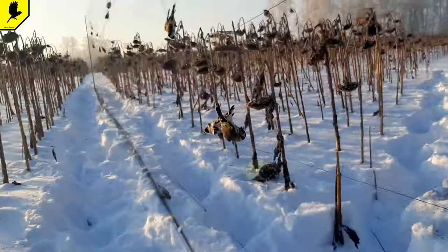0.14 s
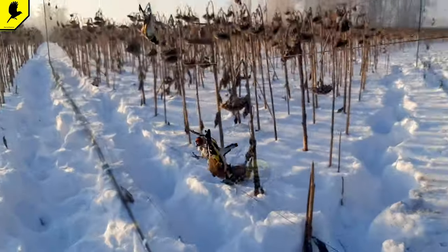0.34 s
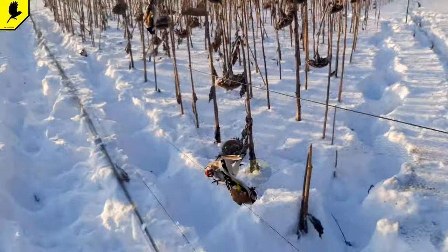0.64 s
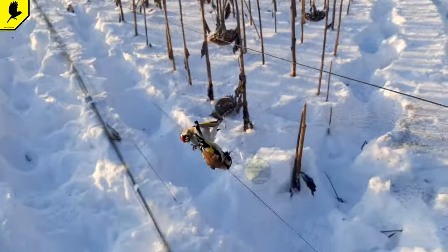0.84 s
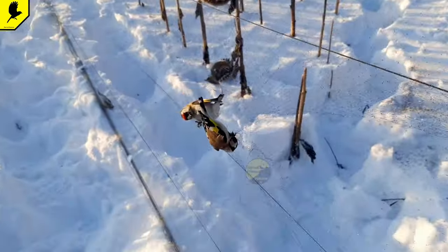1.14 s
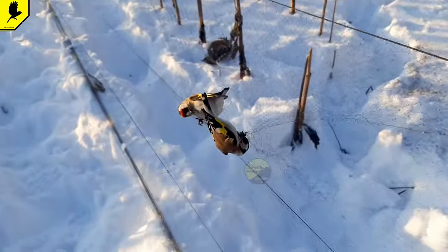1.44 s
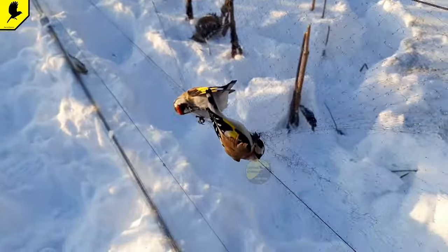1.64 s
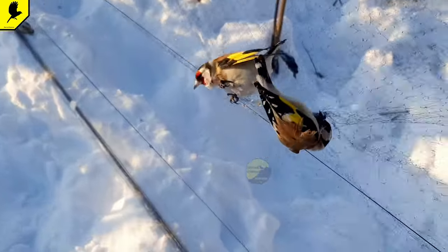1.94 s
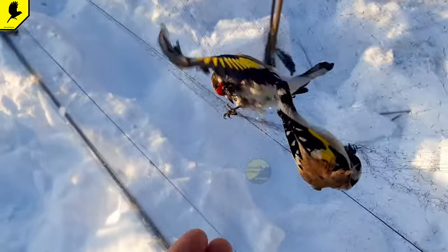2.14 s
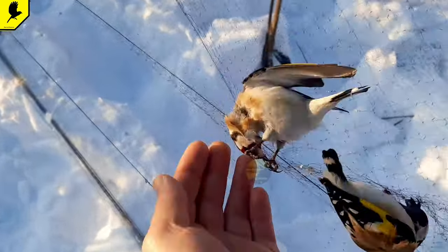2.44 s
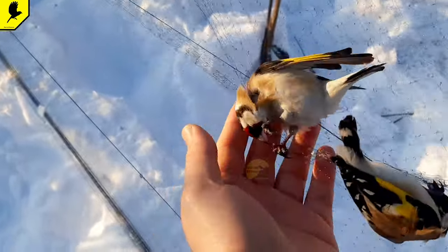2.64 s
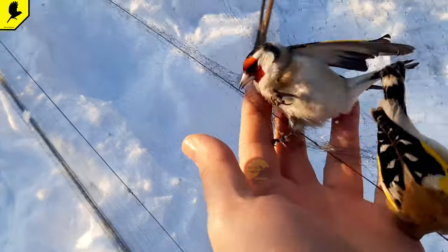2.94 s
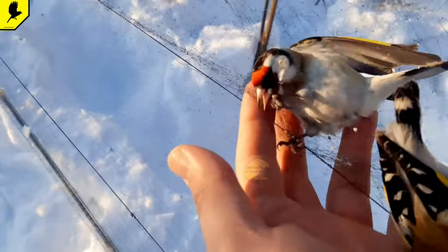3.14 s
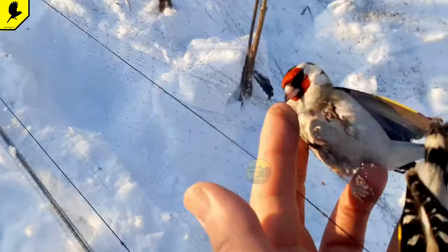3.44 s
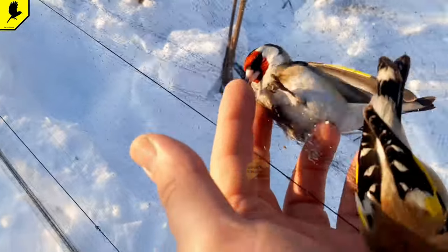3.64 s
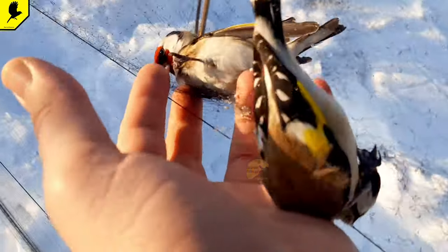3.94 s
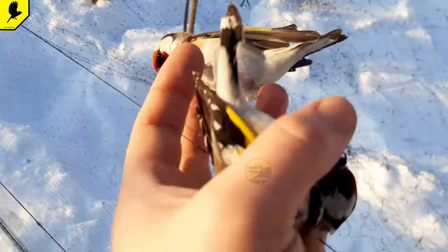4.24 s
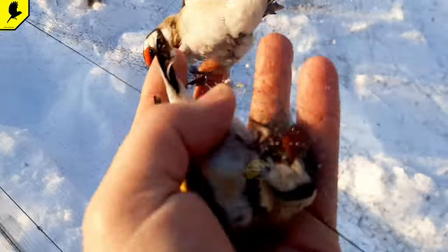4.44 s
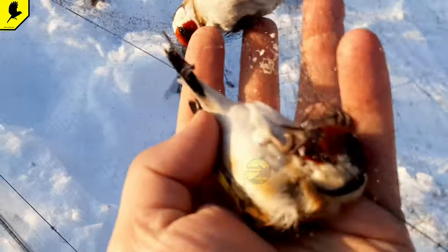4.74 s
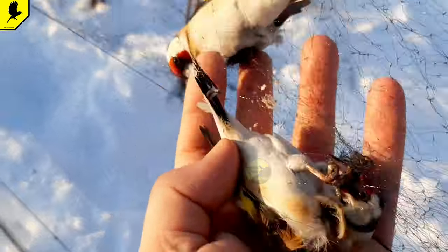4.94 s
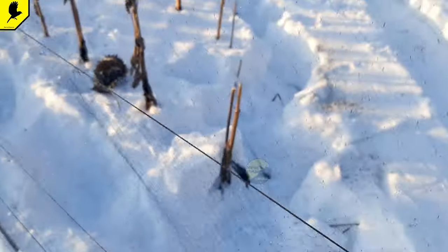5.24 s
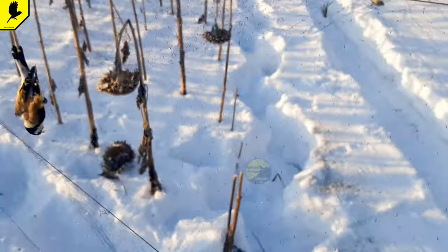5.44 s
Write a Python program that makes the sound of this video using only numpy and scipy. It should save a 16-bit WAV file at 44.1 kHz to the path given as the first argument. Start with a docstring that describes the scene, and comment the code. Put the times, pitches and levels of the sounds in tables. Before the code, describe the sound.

An open winter field heard through a close handheld stereo microphone. From 0 to 0.5 s, boots crunch sharply in cold packed snow, with creaks, brittle cracks and fine treble hiss. Finches chirp in quick, nearly pure whistles, mostly sliding downward, with faint scattered echoes and blurred farther twittering. A strong crunch comes around 0.9-1.1 s, and a soft low knock at 1.4 s. From 1.45 to 1.85 s a bright two-stroke bird figure repeats four times, over heavy crunches at 1.6-1.9 s and thick cloth and net rustle. Winding whistles overlap around 2.4-2.75 s as the steps ease. From 2.7 to 4.1 s small, dull snow creaks tick along, with sparse chirps near 3.1, 3.25 and 3.6 s. Then it is nearly quiet. At 4.5-4.7 s one close bird gives a harsh rising squawk, starting raspy and clearing. From 5 to 5.5 s chirps, rustling and lighter snow steps return.

```python
"""Boots creak and crunch in cold snow while finches caught in a fine net twitter over a snowy field.
Packed snow slips grain by grain, each slip ringing as a thud and a crack; the birds are gliding near-sine
whistles with scattered echoes. Clothes and net rustle in bands of noise close to a hand-held stereo recorder.
One bird in the hand gives a harsh rising squawk: two voices that lock at 4 to 3."""
import sys
import numpy as np
from scipy import signal
from scipy.io import wavfile
from scipy.ndimage import uniform_filter1d

SR = 44100
rng = np.random.default_rng(int(sys.argv[2]) if len(sys.argv) > 2 else 0)


def output_pcm(signal):
    """Save a mono or channel-first signal as 16-bit PCM at the path in sys.argv[1].

    Samples are clipped to [-1, 1] before scaling.
    """
    pcm = np.clip(np.atleast_2d(signal).T, -1, 1) * 32767
    wavfile.write(sys.argv[1], SR, np.round(pcm).astype(np.int16))


N = 246078

# Rings of the snow under the sole. Each row: frequency in Hz, relative level in dB, time to fall 60 dB in s.
THUD_MODES = [(215, 4, 0.022), (330, 5, .024), (455, 11, 0.028), (620, 5, .014), (800, 4, 0.008)]
# Rings of the breaking crust. Each row: frequency in Hz, relative level in dB, time to fall 60 dB in s.
CRACK_MODES = [(1030, -9.5, 0.011), (1360, -11, 0.0084), (1570, 3, 0.0059), (2084, 5.5, 0.004),
               (3500, -5.5, 0.0012), (6200, -7.5, 0.00058), (11500, -15, 0.0014)]


def from_db(db):
    """Decibels to gain."""
    return 10 ** (np.asarray(db) / 20)


def rms_one(x):
    """Scale to rms 1."""
    return x / np.sqrt(np.mean(x ** 2) + 1e-20)


def at_hz(points, hz):
    """Read a curve of (Hz, value) points on a log-frequency axis."""
    point_hz, values = np.array(points).T
    return np.interp(np.log(hz), np.log(point_hz), values)


def over_time(points):
    """Read a curve of (s, value) points at every sample."""
    return np.interp(np.arange(N) / SR, *np.transpose(points))


def band(x, low_hz, high_hz):
    """Second-order band-pass."""
    return signal.sosfilt(signal.butter(2, [low_hz, high_hz], "band", fs=SR, output="sos"), x)


def drift(rate, size=N):
    """Slow random wander of rms 1: noise twice through a one-pole low-pass at the rate in Hz."""
    r = np.exp(-2 * np.pi * rate / SR)
    noise = rng.standard_normal(size + 4000)
    return rms_one(signal.lfilter([1], [1, -2 * r, r * r], noise)[4000:])  # skips the filter's start


def ring(clicks, modes, tilt_db=np.zeros(N)):
    """Every click sets all modes ringing, each with a strength of its own; the tilt is in dB per octave."""
    out, at = 0, np.flatnonzero(clicks)
    for hz, level_db, t60 in modes:
        r, w = from_db(-60 / (t60 * SR)), 2 * np.pi * hz / SR
        chance_db = 2.5 * rng.standard_normal(N)[at]
        blows = np.full(N, 1e-18)
        blows[at] = clicks[at] * from_db(level_db + tilt_db[at] * np.log2(hz / 400) + chance_db)
        out = out + signal.lfilter([0, np.sin(w)], [1, -2 * r * np.cos(w), r * r], blows)
    return out


def rustle(level_db, patchy_db):
    """Cloth, net and air: narrow bands of stereo noise with a common drift and one of five flickers each."""
    # Each row: frequency in Hz, relative density in dB per Hz.
    rustle_spectrum = [(200, 5.5), (900, 6.5), (1500, 7.5), (2900, 8.5), (3600, 10.5), (5000, 6.5),
                       (7400, 3.5), (11000, -3.5), (16000, -2.5)]
    # Each row: frequency in Hz, left-right likeness (0 unlike, 1 the same).
    ear_likeness = [(60, 0.648), (200, 0.89), (600, 0.97), (1600, 0.2), (5000, 0.016)]
    out, together, edges = 0, drift(2.07), 30 * 2 ** np.arange(0, 9.3, .4)
    white = rng.standard_normal((2, 2, N))
    flicker = [drift(19.7) for k in range(5)]
    for k, (low, high) in enumerate(zip(edges, edges[1:])):
        mid, side = band(white[k % 2], low, high)
        hz = np.sqrt(low * high)
        alike = np.clip(at_hz(ear_likeness, hz), -1, 1)
        gain = from_db(at_hz(rustle_spectrum, hz) + patchy_db * (together + flicker[k % 5]))
        out = out + gain * (np.sqrt(1 + alike) * mid + np.sqrt(1 - alike) * side * [[1], [-1]])
    return from_db(level_db + 5.5) * out * from_db([[1.5], [-1.5]])


def hiss():
    """Fine treble noise of cloth and snow dust, own in each channel."""
    # Each row: time in s, relative level in dB.
    treble_curve = [(0, -87), (.06, -49), (0.129, -34.5), (.17, -99), (.35, -48), (.55, -37), (.8, -47.5),
                    (.87, -68), (.92, -42), (.97, -53), (1.2, -44.5), (1.35, -69), (2.25, -64), (2.5, -66),
                    (3.0, -67), (3.3, -68), (3.55, -102), (4.4, -69), (4.7, -54), (4.85, -76), (5.05, -74),
                    (5.58, -59)]
    high_pass = signal.butter(4, 9500, "high", fs=SR, output="sos")
    high = signal.sosfilt(high_pass, rng.standard_normal((2, N)))
    return from_db(over_time(treble_curve) + 1.5 * drift(25)) * rms_one(high) * from_db([[2.5], [-1.5]])


def flock(level_db):
    """Far birds blur into short wavering whistles around a few pitches."""
    # Centre pitches in Hz.
    flock_pitches = [3550, 4300, 4950]
    out = 0
    for hz in flock_pitches:
        phase = 2 * np.pi * np.cumsum(hz * (1 + 0.018 * drift(56.0))) / SR
        right_shift = rng.uniform(0, np.pi) * np.array([[0], [1]])
        bursts = np.clip(drift(21) - .8, 0, 1)  # only the crests of the drift sound
        out = out + bursts * np.sin(phase + right_shift)
    return from_db(level_db + 10) * out


def rumble(level_db):
    """Lumpy low noise of steps and grip carried through the body, partly its own in each channel."""
    shared, *own = rng.standard_normal((3, N))
    low = band(shared + 0.4 * np.array(own), 65, 170)
    return from_db(level_db + 1.6 * drift(11.4)) * rms_one(low) * from_db([[1.5], [-1.5]])


def bumps():
    """Soft knocks on the recorder: each a few cycles of a low tone under a smooth hump."""
    # Each row: start in s, frequency in Hz, peak in dB.
    knock_rows = [(1.391, 97.1, -26.5), (5.04, 61, -46)]
    t, cycles, out = np.arange(N) / SR, 2.2, 0
    for start, hz, peak_db in knock_rows:
        hump = np.sin(np.pi * np.clip((t - start) * hz / cycles, 0, 1)) ** 2
        out = out + from_db(peak_db) * hump * np.sin(2 * np.pi * hz * (t - start))
    return out


def tread():
    """Each step presses in, swells or eases, and lifts off; gives crunch, crackle and rumble in dB."""
    # Weight pressed into the snow. Each row: start in s, length before lifting in s, crunch at the end in dB,
    # swell on the way in dB, crackle at the end in dB, rumble at the end in dB.
    step_rows = [(0.044, 0.16, -29, -5, -33.5, -48.5), (0.225, 0.32, -40.5, -2.5, -40.5, -43),
                 (0.594, 0.22, -46.5, 1.5, -66, -55.5), (0.897, .2, -27.5, 10.5, -32, -45),
                 (1.147, 0.18, -50.5, -2, -49.5, -57.5), (1.302, 0.26, -45, 2, -64, -46.5),
                 (1.539, 0.069, -40, 3, -58, -37.5), (1.621, 0.16, -25, 4, -35.5, -41.5),
                 (1.797, .1, -24.5, 2, -35, -41), (1.93, 0.29, -46, -3, -52.5, -69),
                 (2.193, 0.19, -42, 4.5, -54, -46.5), (2.434, 0.46, -53.5, -2, -67, -85),
                 (2.959, .27, -65.5, -0.5, -70, -66), (3.245, 0.5, -51.5, 2.5, -55.5, -49.5),
                 (3.77, 0.42, -60.5, 0, -55.5, -56.5), (4.173, .19, -51, -5.5, -61.5, -55),
                 (4.379, 0.11, -50, -1.5, -55.5, -46), (4.596, .17, -54.5, 6.5, -64, -61),
                 (5.05, 0.13, -44.5, 15, -41, -59), (5.21, 0.34, -46, -6, -46.5, -50.5)]
    # Levels between steps in dB: crunch, crackle, rumble.
    rest_levels = [-69, -64.5, -88]
    press_s, lift_s = .025, .028
    t, power = np.arange(N) / SR, np.outer(from_db(rest_levels) ** 2, np.ones(N))
    for start, length, crunch_db, swell_db, crackle_db, rumble_db in step_rows:
        gate = np.clip(np.minimum((t - start) / press_s, (start + length - t) / lift_s + 1), 0, 1)
        load = gate * from_db(swell_db * np.clip((t - start) / length - 1, -1, 0))
        power = power + np.outer(from_db([crunch_db, crackle_db, rumble_db]), load) ** 2
    return 10 * np.log10(power)


def firmness():
    """Brightness of the snow thuds over time, dull where the snow lies deep and loose."""
    # Each row: time in s, tilt in dB per octave.
    firmness_curve = [(0, 9), (2.1, -3), (2.9, 4.5), (3.5, -14.5), (4.2, -9), (5.1, 0.5)]
    return over_time(firmness_curve)


def wide(x):
    """Loose snow carries the lows more slowly, so each blow falls in pitch; the right channel hears it late."""
    for stage in range(3):
        x = signal.lfilter([-.97, 1], [1, -.97], x)  # all-pass
    late = np.concatenate([np.zeros(8), x[:-8]])
    return np.array([x * from_db(-1.0), late * from_db(-2.5)])


def crunch(crunch_db, crackle_db):
    """Stick and slip: the harder the load, the faster the snow gives way; each slip is a thud and a crack."""
    load_db = crunch_db + 28
    slips_per_s = 120 * from_db(.4 * load_db + 1.5 * drift(40))
    slips = np.diff(np.floor(np.cumsum(slips_per_s) / SR), prepend=0) * from_db(3 * rng.standard_normal(N))
    grains = (rng.random((2, N)) < 600 / SR) * rng.laplace(size=(2, N))  # about 600 a second
    blows = slips + 0.32 * from_db(0.29 * load_db) * grains[0]
    thud = band(ring(blows, THUD_MODES, firmness()), 150, 1100)
    crack = rms_one(np.array([ring(slips + 0.63 * g, CRACK_MODES) for g in grains]))
    # sparse slips carry the same power in fewer blows
    even = np.sqrt(uniform_filter1d(thud ** 2, SR // 10) + 1e-12)
    return wide(from_db(crunch_db) * thud / even) + from_db(crackle_db) * crack


def creaks():
    """Lone slips of packed snow: a sharp crack and a slower, softer thud set off together."""
    # Each row: time in s, relative level in dB, relative balance of crack over thud in dB.
    creak_rows = [(0.027, -34, 0.5), (0.046, -22.5, -10), (0.058, -17, -5), (0.077, -18.5, -4),
                  (0.23, -23, -19), (0.26, -33, 9.5), (0.293, -19.5, -13.5), (0.333, -23, -32),
                  (0.455, -21.5, -15), (0.481, -24.5, -8), (0.965, -20, -40), (1.014, -16.5, -29),
                  (1.335, -24, -17), (1.464, -25.5, -5.5), (2.065, -18, -30), (2.672, -37, -14),
                  (2.704, -24.5, -26), (2.723, -37, -27), (2.774, -34, -37), (2.797, -34, -13.5),
                  (2.827, -33.5, -13.5), (2.856, -42, -14), (2.878, -41.5, -3), (2.934, -33.5, -11),
                  (2.992, -35, -13.5), (3.105, -45, -4.5), (3.178, -35.5, -8.5), (3.488, -30.5, -45),
                  (3.53, -33.5, -40), (3.558, -38, -35), (3.589, -31.5, -39), (3.626, -40, -33),
                  (3.651, -30.5, -30), (3.702, -30, -38), (3.728, -34, -22), (3.809, -36, -34),
                  (3.85, -36, -28), (3.885, -37, -31), (3.915, -37, -20), (3.948, -37.5, -29),
                  (3.985, -35.5, -30), (4.017, -38, -30), (4.047, -39, -24), (4.077, -41, -27),
                  (4.116, -32, -34), (4.736, -33, -18.5), (5.112, -31, -18), (5.162, -34.5, -11),
                  (5.191, -29.5, -13), (5.224, -28, -10), (5.309, -26, -20), (5.488, -32, -25)]
    s, level_db, crack_db = np.transpose(creak_rows)
    at = np.round((s + 0.0033) * SR).astype(int)  # the blows fall 3.3 ms after the listed times
    thuds, cracks = np.zeros((2, N))
    thuds[at] = from_db(level_db - 13)
    cracks[at] = from_db(level_db + crack_db + 12)
    cracks = cracks + .5 * np.roll(cracks, SR // 400)  # the crust breaks twice
    soft = band(ring(thuds, THUD_MODES, firmness()), 120, 1300)
    return wide(soft + ring(cracks, CRACK_MODES))


def tone(rows, tones, pan_db, lead, buzz, buzz_hz, unsteady):
    """One or two voices of the syrinx and their mixed tones; rasp shakes pitch and level quickly."""
    s, *voices, level_db, rasp = np.transpose(rows)
    at = np.arange(round((s[0] - .003) * SR), round((s[-1] + 0.0019) * SR))
    t = at / SR
    rasp = np.clip(np.interp(t, s, rasp), 0, 1)
    pitch = [np.interp(t, s, hz) * (1 + (.003 + .03 * rasp) * drift(350, size=len(t))) for hz in voices]
    phase = 2 * np.pi * np.cumsum(uniform_filter1d(pitch, 60), axis=1) / SR
    fade = np.clip(np.minimum(t - t[0], t[-1] - t) / 0.0027, 0, 1)
    shaken_db = np.interp(t, s, level_db) + (2.07 + 1.5 * rasp) * drift(84, size=len(t))
    gain = fade * from_db(shaken_db)
    side = np.array([[.5], [-.5]])  # left, right
    wave = sum(from_db(db) * np.sin(np.dot(multiples, phase) + side * lead) for *multiples, db in tones)
    # a fast beat puts side tones round each tone
    beats = np.cumsum(buzz_hz * (1 + unsteady * drift(254.4, size=len(t)))) / SR
    wave = wave * (1 + buzz * rasp ** 2 * np.sin(2 * np.pi * beats))
    ears, out = from_db(side * pan_db), np.zeros((2, N))
    out[:, at] = np.sqrt(2) * gain * wave * ears / np.sqrt(np.mean(ears ** 2))
    return out


def chirp(start, length, from_hz, to_hz, bend, peak_db, share, pan_db, rasp):
    """The pitch slides to its goal while the level swells to a rounded peak and dies."""
    swell_db, die_db = 10.5, 10.5  # how far below its peak a chirp starts and ends
    u, share = np.linspace(0, 1, 17), np.clip(share, .05, .95)
    swell = swell_db * (1 - u / share) ** 2
    die = die_db * ((u - share) / (1 - share)) ** 2
    level_db = peak_db - np.where(u < share, swell, die)
    rebound = .5 * np.clip(bend - 3, 0, 1)  # glides that settle very early swing back by this share
    slide = (1 - u) ** bend + rebound * u ** 2
    return pan_db, rasp, np.transpose([start + u * length, to_hz + (from_hz - to_hz) * slide, level_db])


def finches():
    """Near-sine whistles with a faint octave: single chirps, a repeated figure and winding whistles."""
    # One glide each. Each row: start in s, length in s, from Hz, to Hz, bend (1 straight, more settles early),
    # level at the peak in dB, share of length at the peak, left over right in dB, rasp 0-1.
    chirp_rows = [(0.088, .045, 6200, 4130, 2.3, -26, 0.65, 9, 0.26),
                  (.095, 0.034, 6600, 5670, 3.5, -26, 0.36, 12, 0.28),
                  (.522, 0.042, 6750, 5770, 4.1, -20.5, 0.73, 12.5, 0.18),
                  (.58, 0.05, 3530, 3580, 0.66, -40, 0.67, 3, 0.1),
                  (0.646, 0.053, 5900, 4020, 2.4, -33, 0.98, 4, 0.31),
                  (0.652, 0.044, 6410, 5830, 3.6, -23.5, 0.14, 9, 0.37),
                  (0.765, 0.055, 6200, 3820, 2.4, -34.5, 0.91, 8, 0.39),
                  (0.773, 0.045, 6500, 5740, 5.4, -25.5, 0.4, 7, 0.27),
                  (.815, 0.014, 3680, 3540, 0.85, -27.5, 0.33, 7, 0.42),
                  (0.834, 0.0094, 3500, 7250, 0.85, -29, 0.37, 6, 0.2),
                  (.85, 0.012, 7900, 6050, 2.8, -23, 0.99, 10, 0.15),
                  (0.861, 0.037, 6000, 3930, 3, -38, 0.59, 8, 0.48),
                  (0.859, 0.036, 6900, 5800, 3.8, -23.5, 0.55, 8, 0.16),
                  (.934, 0.029, 6250, 6380, 1.9, -28.5, 0.66, 8, 0.13),
                  (0.981, 0.026, 5020, 5900, 0.97, -34, 0.31, 7, 0.35),
                  (1.036, 0.09, 3500, 4600, 1.7, -27, 0.65, 5.5, 0.48),
                  (1.032, 0.017, 3550, 3620, 0.56, -24.5, 0.43, 16.5, 0.14),
                  (1.15, 0.1, 3480, 3648, 1.03, -40.5, 0.25, 3, 0.31),
                  (1.185, 0.034, 6120, 6320, 1.04, -36, 0.29, 7, 0.18),
                  (1.189, 0.024, 6750, 8070, 1.2, -32, 0.8, 20, 0.12),
                  (1.247, 0.095, 8040, 6260, 3, -29.5, 1, 7, 0.34),
                  (1.258, 0.083, 5010, 4310, 3.2, -26, 0.081, 1.5, 0.24),
                  (1.263, 0.063, 2610, 2340, 3.3, -33.5, 0.25, -5.5, 0.26),
                  (1.395, 0.027, 3490, 3550, 1, -35, 0.85, 1, 0.14),
                  (1.687, 0.049, 7473, 5890, 3.65, -27, 0.47, 10, 0.26),
                  (1.862, .039, 6555, 5913, 2.2, -28.5, 0.71, 3.5, .14),
                  (1.912, 0.054, 5870, 6360, 5.1, -31, 0.63, 5, 0.26),
                  (1.923, 0.049, 4910, 4230, 3.5, -28.5, 0.19, -1, 0.28),
                  (2.007, 0.024, 3190, 4360, 0.97, -24.5, 0.4, -3, 0.5),
                  (2.063, 0.019, 5700, 5700, 2.7, -35.5, 0.91, -3, 0.33),
                  (2.114, 0.036, 4900, 3330, 1.15, -33.5, 0.8, 3, 0.78),
                  (2.16, 0.056, 3070, 3860, 2.05, -24, 0.07, 1, 0.33),
                  (2.262, 0.054, 6290, 5485, 0.54, -30.5, 0.27, -1, 0.45),
                  (2.333, 0.12, 4950, 3230, 1.65, -25.5, 0.78, 1, 0.41),
                  (2.4, 0.086, 1967, 2825, 1.36, -37.5, 0.79, -12, 0.69),
                  (2.654, 0.066, 7000, 7300, 2.36, -43.5, 0.94, 8, .2),
                  (2.66, 0.049, 5860, 6280, 2.4, -41, 0.78, -2, 0.15),
                  (2.66, 0.07, 6570, 6720, 3.3, -45, .7, 4, .15),
                  (2.73, 0.028, 2500, 3300, 3.77, -27.5, 0.33, -3, 0.48),
                  (2.731, 0.02, 5100, 6580, 4.1, -34, 0.5, -3, 0.41),
                  (2.76, 0.03, 2070, 2490, 1.25, -34.5, 0.18, -14, 0.14),
                  (2.76, 0.019, 4190, 4740, 0.45, -35.5, 0.12, 6, 0.42),
                  (3.106, 0.045, 7280, 5800, 3.3, -32.5, 0.96, -1.5, 0.077),
                  (3.245, 0.053, 6990, 5650, 5, -35, 0.45, -1, 0.34),
                  (3.248, 0.047, 5393, 4044, 3.45, -33, 0.7, 8, 0.15),
                  (3.255, 0.026, 3560, 2416, 3.16, -36, 1, -17, 0.3),
                  (5.038, 0.04, 7420, 6246, 5.9, -32, 0.38, 9, 0.28),
                  (5.132, 0.052, 6300, 4112, 2.9, -28, 0.65, 3, 0.28),
                  (5.145, 0.025, 6194, 5880, 6.2, -31.5, 0.23, 8.5, 0.35),
                  (5.218, 0.046, 6036, 3770, 3.3, -28, 0.38, 2.5, 0.26),
                  (5.231, 0.026, 6000, 5900, 1.79, -34, 0.18, 9, 0.2),
                  (5.234, 0.023, 2268, 2054, 1.7, -35.5, 0.4, -13, 0.53),
                  (5.295, 0.051, 4240, 4000, 0.91, -45.5, 0.62, 0, 0.52),
                  (5.521, .055, 4190, 4403, 0.86, -44, 0.73, 4, 0.59)]
    # A two-stroke figure sung four times. Each row: start in s, first and second stroke in dB.
    figure_rows = [(1.448, -20.5, -24), (1.563, -20.5, -22), (1.676, -21.5, -24.5), (1.789, -20, -22)]
    # Its strokes. Each row: left over right in dB, rasp 0-1,
    # points of (s after start, pitch in Hz, dB relative to the stroke).
    stroke_rows = [(4, 0.16, [(0, 6600, -28), (.005, 4370, 1), (.01, 4850, -13), (.023, 4738, -13),
                   (.031, 3550, -12)]), (1, 0.42, [(.032, 4550, -3.5), (.049, 3800, -10), (.057, 3386, -2),
                   (.074, 3440, -10)])]
    # Winding whistles, whose pitch and level bend several times.
    # Each row: left over right in dB, rasp 0-1, points of (s, pitch in Hz, level in dB).
    whistle_rows = [(0.5, 0.29, [(2.452, 2820, -42), (2.48, 3240, -28.5), (2.56, 3363, -37),
                    (2.595, 3450, -33), (2.615, 3560, -44), (2.66, 4200, -29.5), (2.7, 4240, -37.5),
                    (2.73, 4290, -41)]), (-2, 0.75, [(2.43, 4300, -39), (2.455, 5200, -41.5),
                    (2.48, 6217, -44.5), (2.51, 6280, -41), (2.535, 5800, -45)]),
                    (0, 0.25, [(2.525, 5274, -41), (2.565, 4640, -51), (2.64, 4670, -51), (2.69, 4800, -36),
                    (2.715, 4760, -47)]), (-0.5, 0.33, [(3.595, 6340, -37.5), (3.635, 5870, -27.5),
                    (3.66, 4964, -35), (3.682, 4526, -34.5)]), (-11.5, 0.12, [(2.532, 2474, -33.5),
                    (2.56, 2353, -31), (2.62, 2310, -39), (2.68, 2386, -32), (2.722, 2364, -38)])]
    # Lead of the left channel, read at a note's last pitch. Each row: pitch in Hz, lead in radians.
    left_leads = [(2400, 4.42), (3400, 1.18), (4300, 0.99), (6000, 1.26)]
    notes = [chirp(*row) for row in chirp_rows] + whistle_rows
    for start, *strokes_db in figure_rows:
        for db, (pan_db, rasp, points) in zip(strokes_db, stroke_rows):
            notes.append((pan_db, rasp, np.add(points, [start, 0, db])))
    out = 0
    for pan_db, rasp, points in notes:
        rows = [(*point, rasp) for point in points]
        lead = at_hz(left_leads, points[-1][1])
        out = out + tone(rows, [(1, 0), (2, -30)], pan_db, lead, buzz=4, buzz_hz=300, unsteady=.25)
    return out


def squawk():
    """The bird in the hand: two rising voices that lock at 4 to 3, with their harmonics and mixed tones."""
    # Each row: time in s, upper voice in Hz, lower voice in Hz, level in dB, rasp 0-1.
    squawk_rows = [(4.51, 2500, 1900, -49, .8), (4.53, 2750, 2000, -42, .6), (4.55, 2950, 2280, -35, .42),
                   (4.602, 3090, 2510, -31.5, .35), (4.609, 3130, 2390, -29, .03),
                   (4.67, 3360, 2520, -26, 0), (4.71, 3370, 2530, -27.5, 0), (4.725, 3250, 2440, -43, 0)]
    # Each row: multiple of the upper voice, multiple of the lower voice, relative level in dB.
    squawk_mix = [(1, 0, 0), (0, 1, -4), (0, 2, -10), (2, 0, -10), (0, 3, -17), (1, 1, -26), (0, 5, -29),
                  (3, 0, -22), (4, 0, -29)]
    # left 6.5 dB over right and 1.83 radians ahead
    return tone(squawk_rows, squawk_mix, pan_db=6.5, lead=1.83, buzz=4, buzz_hz=1000, unsteady=.7)


def field(x):
    """Scattered echoes from stalks and the tree line: dying noise, own in each channel."""
    echo_db, echo_t60_s = -16, 0.5
    t = np.arange(round(.6 * SR)) / SR
    tail = rng.standard_normal((2, len(t))) * from_db(-60 * t / echo_t60_s) * (t > .01)
    tail /= np.sqrt(np.sum(tail ** 2, axis=1, keepdims=True))
    return from_db(echo_db) * signal.fftconvolve(x, tail, axes=1)[:, :N]


def scene():
    """Birds with their echoes, the close squawk, snow and rustle."""
    # Stir of cloth, net and air, which the far flock follows too. Each row: time in s, relative level in dB.
    stir_curve = [(0, -59.5), (.06, -60), (.13, -52), (.2, -56), (.55, -48.5), (.8, -48.5), (.88, -52),
                  (.92, -49.5), (1.0, -56), (1.3, -56), (1.68, -45.5), (1.9, -45.5), (2.4, -51),
                  (2.75, -61), (2.999, -69.5), (3.299, -61), (3.46, -68), (4.15, -69.5), (4.22, -63.5),
                  (4.36, -69), (4.54, -59.5), (4.749, -63), (4.82, -79.5), (5.03, -64.5), (5.2, -51),
                  (5.58, -55.5)]
    crunch_db, crackle_db, rumble_db = tread()
    stir_db = over_time(stir_curve)
    birds = finches() + flock(stir_db)
    close_bird = squawk()
    snow = crunch(crunch_db, crackle_db) + creaks() + bumps() + rumble(rumble_db)
    echoes = field(birds + 0.026 * close_bird)
    return birds + echoes + close_bird + snow + rustle(stir_db, patchy_db=3.5) + hiss()


def record(dry):
    """The microphone ports dip in the treble, ring lower down and thin the bass; peaks are rounded, the top cut."""
    # Edges of the treble dip in Hz.
    dip_edges = [7930, 9690]
    # Narrow rings of the microphone ports. Each row: frequency in Hz, width in Hz, added level in dB.
    port_rings = [(1532, 93, -6), (2040, 120, -2)]
    notch = signal.butter(1, dip_edges, "bandstop", fs=SR, output="sos").repeat(2, axis=0)  # passed twice
    ported = signal.sosfilt(notch, dry)
    for hz, width, db in port_rings:
        ported = ported + from_db(db) * signal.lfilter(*signal.iirpeak(hz, hz / width, fs=SR), ported)
    bass_cut = signal.butter(3, 60, "high", fs=SR, output="sos")
    thin = signal.sosfilt(bass_cut, ported + 0.07 * dry)
    top_cut = signal.ellip(14, .5, 70, 15800, fs=SR, output="sos")
    return signal.sosfilt(top_cut, np.tanh(thin))


dry = scene()
out = record(dry)
output_pcm(out)
```